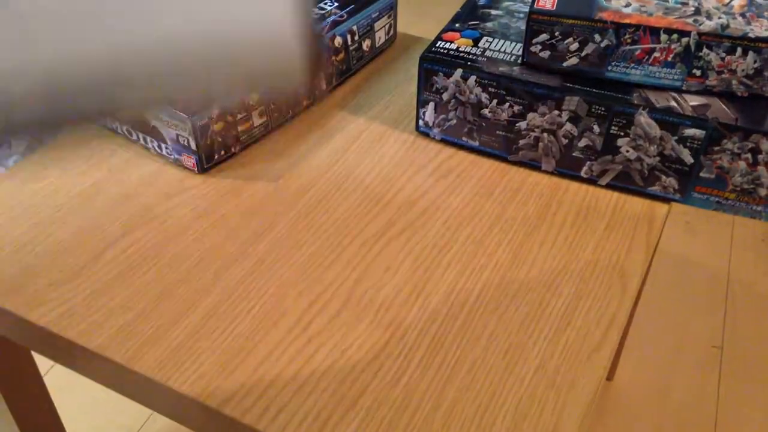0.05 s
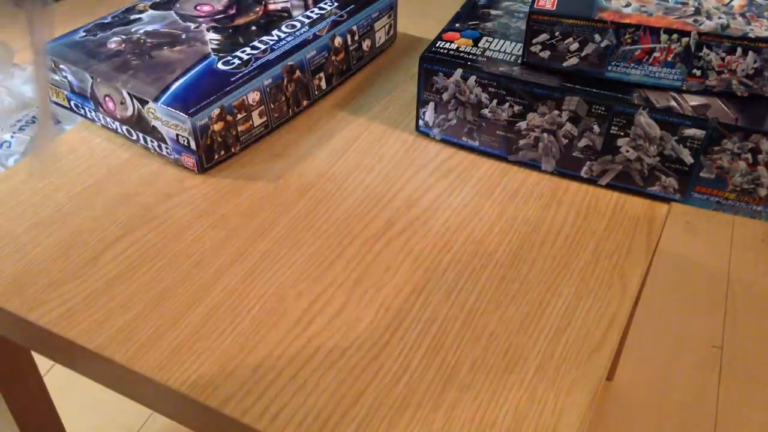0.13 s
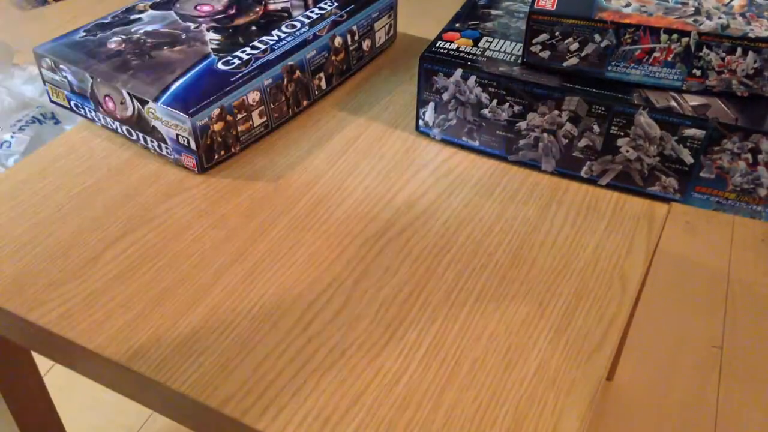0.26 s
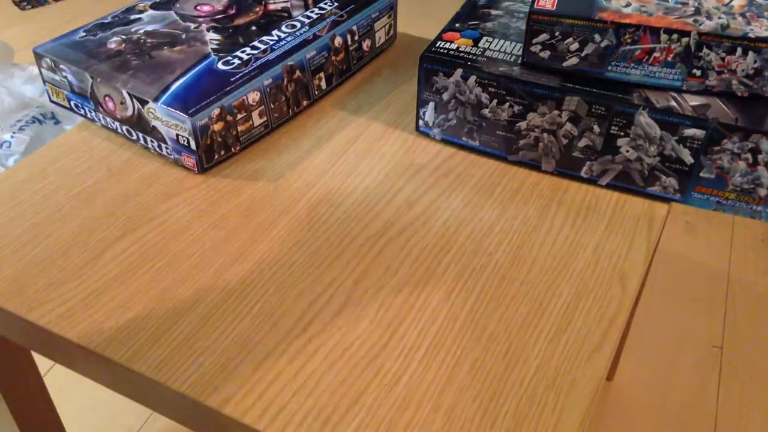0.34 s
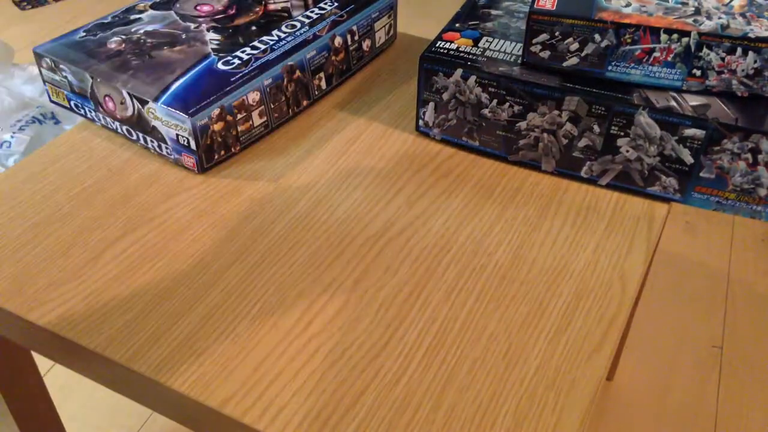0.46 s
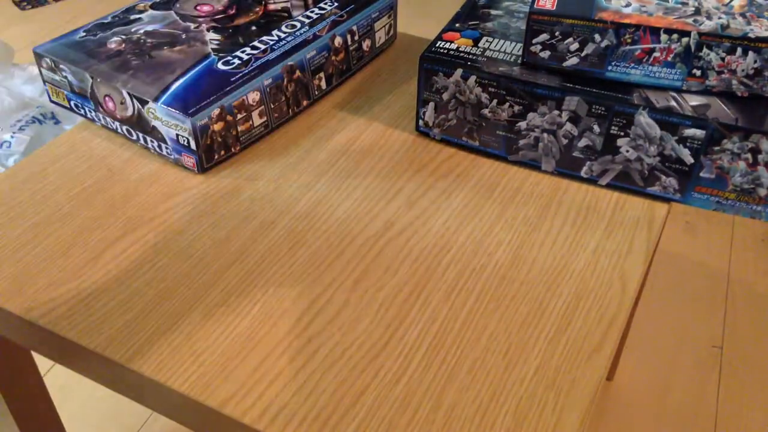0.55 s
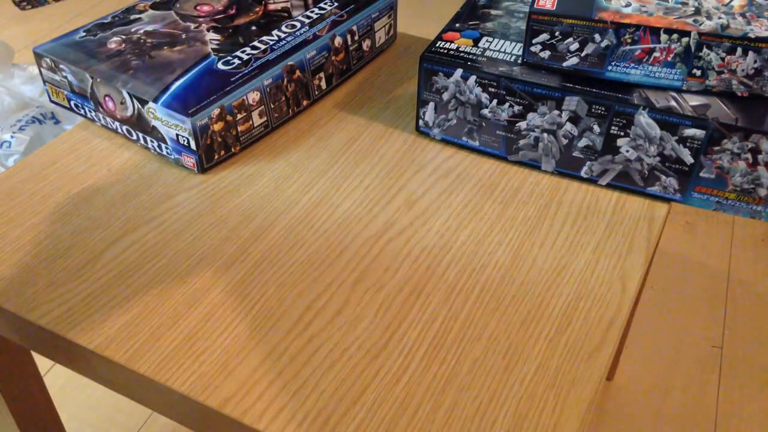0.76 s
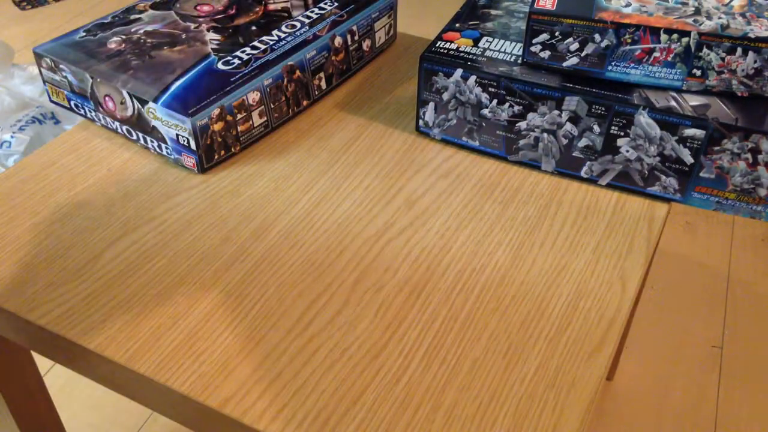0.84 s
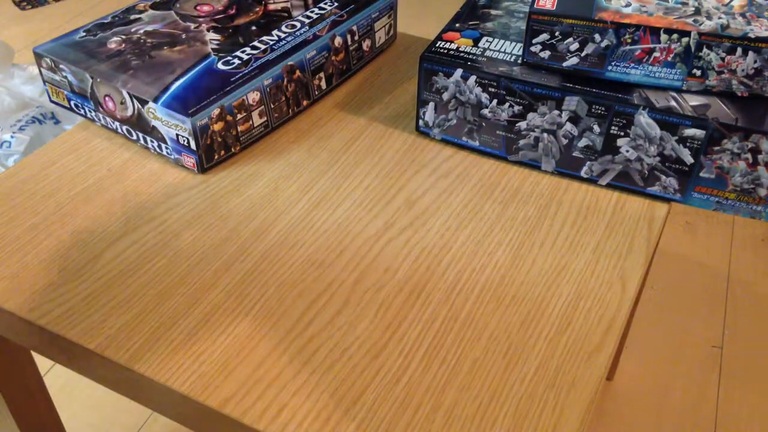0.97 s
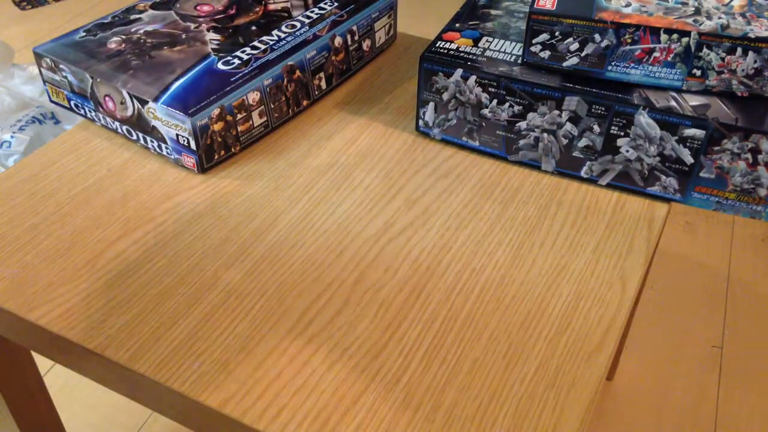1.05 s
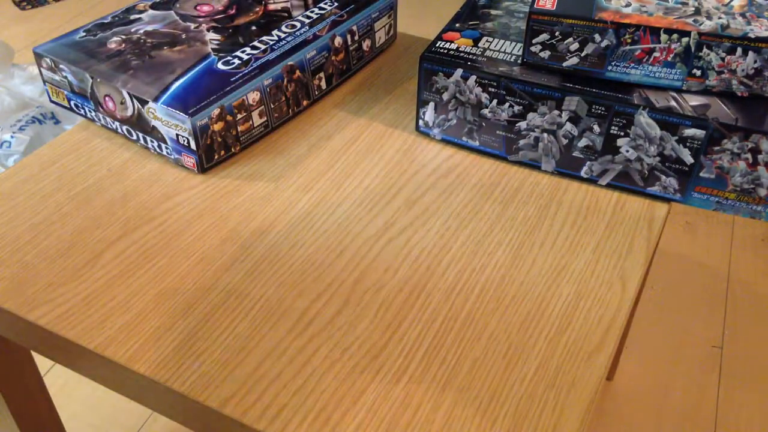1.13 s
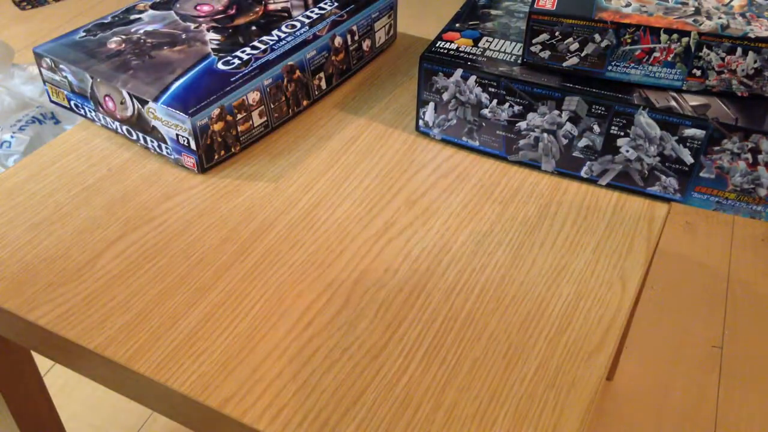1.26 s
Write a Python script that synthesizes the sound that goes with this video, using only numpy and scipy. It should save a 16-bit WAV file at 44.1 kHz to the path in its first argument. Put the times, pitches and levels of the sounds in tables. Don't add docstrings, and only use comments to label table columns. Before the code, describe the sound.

Close handling of a cardboard box: gritty rubbing, a quick clicking pop of the lid, a short creak, a harder squeaky creak, then sparse ticks and snaps over faint room hum.

```python
import sys
import numpy as np
from scipy import signal
from scipy.fft import rfft, irfft
from scipy.io import wavfile
from scipy.ndimage import uniform_filter1d

SR = 44100
rng = np.random.default_rng(int(sys.argv[2]) if len(sys.argv) > 2 else 0)


def wav_out(sig):
    wavfile.write(sys.argv[1], SR, np.round(np.clip(np.atleast_2d(sig).T, -1, 1) * 32767).astype(np.int16))


def linear_from_db(decibels):
    return 10 ** (np.asarray(decibels, float) / 20)


N = 57330

# f/Hz, level/dB per Hz
AIR_COLOUR = [(18, -5.5), (30, -12.5), (355, -3.5), (569, -7), (780, -8.5), (2060, -20.5), (3140, -17.5),
              (4190, -35), (16000, -54)]
# f/Hz, level/dB
HUM_LINES = [(49, -66.5), (150, -68.5), (350, -69)]
# t/s, level/dB
RUB_LEVEL = [(0, -44.5), (0.028, -51.5), (.06, -45), (.1, -42), (0.137, -32), (.19, -31), (0.203, -35),
             (0.248, -35.5), (.3, -42), (.33, -47.5), (.47, -44.5), (0.578, -55), (0.707, -36), (.8, -52.5),
             (0.872, -67), (0.931, -47.5), (1.048, -70), (1.201, -71), (1.236, -49.5), (1.3, -73)]
# f/Hz, level/dB per Hz
RUB_COLOUR = [(180, -44.5), (300, -8), (762, -5.5), (842, -10.5), (1430, -5), (1870, -3.5), (3240, -1),
              (5800, 1.5), (16000, -4.5)]
# times [t/s], then levels [level/dB]
OVERLAP_TIMES = (0.087, 0.26, .21)
OVERLAP_LEVELS = (2, -17, 7)
# t/s, peak level/dB, colour f/Hz, length/ms
TICK_EVENTS = [(0.0333, -27, 7480, 4), (0.046, -32, 5460, 7), (.0563, -24, 6000, 4.2),
               (0.0694, -32, 3140, .8), (0.338, -35, 7000, 19), (0.371, -28.5, 10900, 3.2),
               (0.524, -37.5, 7100, 5.8), (.545, -29.5, 6660, 3.7), (0.552, -34, 2150, 5.6),
               (0.5927, -19, 12100, 0.25), (0.833, -29, 6040, 2.1), (0.9233, -29, 3200, 1.4),
               (0.9252, -33.5, 11100, 2), (0.933, -33, 4000, 1.6), (0.935, -37, 12500, 2.6),
               (0.9406, -27.5, 4000, 2.1), (0.9432, -27, 5850, 2.5), (1.0047, -34, 2010, 1.6),
               (1.087, -44, 9260, 0.75), (1.097, -42.5, 2880, 3.6), (1.105, -47, 7930, 5),
               (1.1163, -33, 13070, 2), (1.193, -43.5, 4000, 5.1), (1.2052, -31, 9000, 0.78),
               (1.2284, -37, 7000, .7), (1.24, -40, 10000, 1.5), (1.243, -36, 12000, 2),
               (1.2533, -39.5, 7060, 1.6)]
# f/Hz, level/dB per Hz
TICK_TONE = [(300, -44), (1000, -0.5), (3000, 4), (8000, 0.5), (16000, 7.5)]
# t/s, level/dB, push/ms
BUMPS = [
    (0.2075, -36, 2.4),
    (.2105, -39, 2.73),
    (0.289, -38.5, 1.1),
    (.25, -45, 5.7),
    (0.699, -52.5, 5.2),
    (1.14, -53, 13),
]
# t/s, peak level/dB, colour f/Hz, length/ms
POP_EVENTS = [(0.21, -14.5, 8800, 0.6), (0.2183, -17.5, 13400, 2.4), (0.2213, -12.5, 2960, 10.4),
              (0.2262, -11.5, 2850, 8.1), (0.2354, -11.5, 2900, 5.3), (.2435, -11, 10400, 4.2),
              (0.2548, -19.5, 7050, 2.2), (.260, -26.5, 10900, 21.6), (.2695, -34, 2980, 4.1),
              (0.2912, -31, 1570, 15), (.2989, -33, 830, 4.7)]
# f/Hz, level/dB per Hz
POP_TONE = [(300, -7), (1000, 3), (3000, 1.5), (6000, 5.5), (8500, -1), (11000, 2.5), (16000, 6.5)]
# f/Hz, level/dB, time to fall 60 dB/s
POP_BOX = [(109, -12.5, 0.051), (175, -10, 0.018), (245, -8, 0.031), (519, -2, 0.038), (840, -21, 0.048),
           (1111, -9.5, 0.029)]
# t/s, peak level/dB, edge pitch f/Hz
FIRST_CREAK = [(.3796, -20.5, 2230), (0.3831, -17.5, 2270), (.3874, -13.5, 2850), (.394, -10.5, 2520),
               (0.3989, -8.5, 2280), (0.4029, -17, 2400), (0.4043, -16.5, 2200), (0.4068, -10, 2500),
               (0.4108, -19.5, 2450), (.414, -9.5, 2550), (0.4188, -7.5, 2530), (.424, -8.5, 2470),
               (0.4262, -12.5, 2800), (0.4299, -14, 2600), (0.4351, -14.5, 2450), (0.4371, -17.5, 2670),
               (0.4374, -12.5, 2900), (0.4433, -20, 2730), (.449, -24.5, 2600), (0.4596, -24.5, 2710),
               (0.4641, -17, 2750), (0.5053, -34.5, 2970)]
# t/s, level/dB, push/ms
FIRST_FLEX = [
    (.3975, -46.5, 1),
    (.4075, -44.5, 1),
    (.432, -46.5, 1),
]
# f/Hz, level/dB, time to fall 60 dB/s
FIRST_BOX = [(248, -43, 0.05), (414, -6.5, 0.038), (738, -10.5, 0.03), (1058, -17, 0.052)]
# t/s, peak level/dB, edge pitch f/Hz,
# length/ms, edge ring level/dB
SECOND_CREAK = [(.4918, -24, 2870, 1.23, 8), (.5921, -34, 2800, 2.1, 5.5), (.6072, -17, 2850, 3, 8),
                (.6142, -11, 2800, 2.34, 5), (.6224, -18, 3150, 1.5, 3), (.6262, -4, 2890, 1.1, 3),
                (.6243, -3.5, 2940, 1.25, 3), (.6288, -7.5, 2884, 2, 7.5), (.6383, -11.5, 3400, 1.75, 12),
                (.6414, -11, 3250, 1.9, 3.5), (.6448, -7.5, 3050, 3.7, -4.5), (.6543, -10, 3440, 6.6, -9.5),
                (.6584, -10, 2776, 7, -0.5), (.663, -8.5, 2900, 0.59, -8.5), (.6728, -12, 2950, 1.7, 7.5),
                (.675, -11, 2900, 2.1, 5.5), (.6779, -8, 3030, 1.6, 1), (.680, -13, 2870, 2.8, 8),
                (.6906, -3.5, 2790, 1.58, -7.5), (.6925, -10.5, 2980, 0.9, 4.5),
                (.695, -14.5, 3330, 3.2, 4), (.6998, -9, 3200, 0.79, -27), (.7026, -11, 3390, 4.8, -9.5),
                (.7185, -39, 2920, 3.4, 0), (.740, -32, 3100, 1.9, -23)]
# t/s, level/dB, push/ms
SECOND_FLEX = [
    (.6285, -35, 1.6),
    (.6815, -40, 1.2),
    (.6865, -36.5, 0.94),
    (.694, -38, .8),
    (.718, -40, .8),
    (.727, -41, 0.71),
    (.737, -53, 0.66),
]
# f/Hz, level/dB, time to fall 60 dB/s
SECOND_BOX = [(101.9, -25.5, 0.0524), (253, -41.5, 0.031), (392, -6, 0.032), (493, -8, 0.03),
              (810, -11, 0.019), (1074, -18, 0.05), (1285, -18, 0.032)]
# f/Hz, level/dB per Hz
CREAK_TONE = [(300, -8.5), (1000, -2), (2000, 5), (4000, 1), (7000, -1), (11000, 1), (16000, -0.5)]
# t/s, peak level/dB, colour f/Hz, length/ms, edge ring level/dB
BRIGHT_SNAP = [
    (.8831, -17.5, 4000, 1.8, -30),
]
# f/Hz, level/dB per Hz
BRIGHT_TONE = [(300, -20), (700, -11), (1430, -7), (2930, 1), (4930, -1), (7760, -9), (12400, -3),
               (16500, -5)]
# t/s, peak level/dB, colour f/Hz, length/ms, edge ring level/dB
FIBRE_CRACKS = [
    (.8878, -32, 1600, 1.6, 10),
    (.8914, -39, 2500, 1.6, 0),
    (.8930, -37, 3800, 1.2, -7),
    (.9005, -50, 3010, 5, 9),
    (1.2307, -48, 2410, 0.46, -15.5),
    (1.2325, -30, 2340, 3, -14),
]
# f/Hz, level/dB per Hz
CRACK_TONE = [(200, -21.5), (600, -6), (2000, 20), (6000, -13), (16000, -9)]
# t/s, peak level/dB, colour f/Hz, length/ms, edge ring level/dB
DULL_SNAP = [
    (1.2317, -23.5, 2400, 1.5, -30),
]
# f/Hz, level/dB per Hz
DULL_TONE = [(300, -11), (1300, 0), (2400, 3), (3500, -2), (6240, -4), (9490, -11), (10700, -8),
             (16500, -14)]


def unit(x):
    return x / np.sqrt(np.mean(x ** 2))


def colour(x, shape):
    hz, db = np.array(shape).T
    grid = np.log(np.arange(513) * SR / 1024 + 1)
    log_gain = np.interp(grid, np.log(hz), db) * np.log(10) / 20
    cep = irfft(log_gain)
    cep[1:512] *= 2
    cep[513:] = 0
    taps = irfft(np.exp(rfft(cep)))
    return signal.fftconvolve(x, taps / np.sqrt(np.sum(taps ** 2)))[:len(x)]


def ring(x, hz, width_hz):
    r = np.exp(-np.pi * width_hz / SR)
    feedback = [1, -2 * r * np.cos(2 * np.pi * hz / SR), r * r]
    return signal.lfilter([1, 0, -1], feedback, x) * np.sqrt((1 - r * r) / 2)


def box(x, modes):
    return sum(linear_from_db(db) * ring(x, hz, np.log(1000) / np.pi / t60) for hz, db, t60 in modes)


def panel_push(rows, modes):
    t = np.arange(N) / SR
    push = np.zeros(N)
    for s, db, ms in rows:
        progress = np.clip((t - s) * 1000 / max(ms, .2), 0, 1)
        push += linear_from_db(db) * np.sin(np.pi * progress) ** 2
    return box(push, modes)


def slips(rows, shape, modes, width, upper_hz, upper_db, wide_db, box_db, spiky_db, snap_db,
          rise_ms=0., squeak_db=-63.0, kick_db=-63.0):
    span = 2048
    t = np.arange(span) / SR
    raw, edge, kicks = np.zeros((3, N + span))
    for s, db, hz, ms, edge_db in rows:
        chance = rng.standard_normal(span)
        size = np.minimum(rng.exponential(size=span), 4)
        length = max(ms, .1) / 1000
        rise = np.clip((t * 1000 + .1) / (rise_ms + .1), 0, 1)
        grip = np.exp(-(t / length) ** 2) * rise

        swarm = chance * linear_from_db(spiky_db * size) * grip
        swarm = swarm / np.sqrt(np.sum(swarm ** 2) / (1 + length * SR))
        snap = linear_from_db(snap_db) * (t == 0)
        swarm = linear_from_db(db - 10.0) * (swarm + snap)
        i = int(s * SR)
        raw[i:i + span] += swarm
        kicks[i] += linear_from_db(db - 9.0 + kick_db)

        locked = linear_from_db(db - 12.5 + squeak_db) * grip * np.sin(2 * np.pi * hz * t + chance[-1])
        tone = ring(swarm + locked, hz, 2 * width * hz)
        tone = ring(tone, hz, width * hz)
        match = np.sqrt(np.sum(swarm ** 2) / np.sum(tone ** 2))
        edge[i:i + span] += linear_from_db(edge_db) * tone * match
    flap = linear_from_db(upper_db) * ring(raw, upper_hz, upper_hz / 5)
    fibres = linear_from_db(wide_db) * colour(raw, shape)
    hollow = linear_from_db(box_db) * box(raw + kicks, modes)
    return np.array([edge, flap + fibres + hollow])[:, :N]


def air():
    noise = rfft(rng.standard_normal(N))
    hz, db = np.array(AIR_COLOUR).T
    grid = np.log(np.arange(len(noise)) * SR / N + 1)
    noise = noise * linear_from_db(np.interp(grid, np.log(hz), db))
    t = np.arange(N) / SR
    hum = np.zeros(N)
    for f, level in HUM_LINES:
        waver = 1.6 * unit(uniform_filter1d(rng.standard_normal(N), size=6000))
        hum += linear_from_db(level) * np.sqrt(2) * np.sin(2 * np.pi * f * t + waver)
    return unit(irfft(noise, N)) * linear_from_db(-61) + hum


def slide():
    s, db = np.array(RUB_LEVEL).T
    t = np.arange(N) / SR
    grit = linear_from_db(2.8 * np.minimum(rng.exponential(size=N), 4))
    hiss = unit(colour(rng.standard_normal(N) * grit, RUB_COLOUR))
    split = signal.butter(4, 4000, fs=SR, output="sos")
    low = signal.sosfiltfilt(split, hiss)
    low_gain = linear_from_db(np.interp(t, OVERLAP_TIMES, OVERLAP_LEVELS))
    flutter = unit(uniform_filter1d(rng.standard_normal(N), size=150))
    return (hiss - low + low * low_gain) * linear_from_db(np.interp(t, s, db) + 1.8 * flutter)


def room(x):
    t60_s, top_t60_s, gap_s = 0.18, 0.059, 0.00065
    t = np.arange(SR // 2) / SR
    noise = rng.standard_normal(len(t))
    low = signal.lfilter([.4], [1, -.6], noise)
    tail = low * linear_from_db(-60 * t / t60_s) + (noise - low) * linear_from_db(-60 * t / top_t60_s)
    tail = tail * np.clip(t / gap_s - 1, 0, 1)
    tail = signal.sosfilt(signal.butter(2, 224, "high", fs=SR, output="sos"), tail)
    return linear_from_db(-10) * signal.fftconvolve(x, tail / np.sqrt(np.sum(tail ** 2)))[:N]


def ticks():
    rows = [(*row, -1.5) for row in TICK_EVENTS]
    return slips(rows, TICK_TONE, FIRST_BOX, width=0.59, upper_hz=1600, upper_db=-23.5,
                 wide_db=2.2, box_db=-20, spiky_db=0.81, snap_db=15.1)


def bumps():
    return panel_push(BUMPS, POP_BOX)


def lid_pop():
    rows = [(*row, -4) for row in POP_EVENTS]
    return slips(rows, POP_TONE, POP_BOX, width=0.39, upper_hz=12000, upper_db=-10.0,
                 wide_db=5.44, box_db=-10.5, spiky_db=1.4, snap_db=3)


def first_creak():
    rows = [(*row, 0.95, -2.5) for row in FIRST_CREAK]
    sound = slips(rows, CREAK_TONE, FIRST_BOX, width=0.15, upper_hz=5520, upper_db=0.67,
                  wide_db=2.4, box_db=-5.5, spiky_db=5.7, snap_db=2.2, rise_ms=0.68, kick_db=18)
    sound[1] += panel_push(FIRST_FLEX, FIRST_BOX)
    return sound


def second_creak():
    sound = slips(SECOND_CREAK, CREAK_TONE, SECOND_BOX, width=0.32, upper_hz=5440, upper_db=-5.0,
                  wide_db=-1, box_db=-10.5, spiky_db=0.72, snap_db=9.9,
                  rise_ms=.6, squeak_db=2.0, kick_db=12.5)
    sound[1] += panel_push(SECOND_FLEX, SECOND_BOX)
    return sound


def bright_snap():
    return slips(BRIGHT_SNAP, BRIGHT_TONE, FIRST_BOX, width=1, upper_hz=1200, upper_db=-40,
                 wide_db=0, box_db=-30, spiky_db=2, snap_db=22)


def fibre_cracks():
    return slips(FIBRE_CRACKS, CRACK_TONE, FIRST_BOX, width=0.97, upper_hz=1296, upper_db=-16,
                 wide_db=-0.66, box_db=-2, spiky_db=2.3, snap_db=11.5)


def dull_snap():
    return slips(DULL_SNAP, DULL_TONE, FIRST_BOX, width=1, upper_hz=1200, upper_db=-40,
                 wide_db=0, box_db=-24, spiky_db=2, snap_db=22)


def scene():
    background = air()
    rubbing = slide()
    edge, body = (ticks() + lid_pop() + first_creak() + second_creak()
                  + bright_snap() + fibre_cracks() + dull_snap())
    body = body + rubbing + bumps()
    echoes = room(body + linear_from_db(-5) * edge)
    return (edge + body + echoes + background)[None, :]


def low_pass(x):
    return signal.sosfilt(signal.butter(12, 17010, fs=SR, output="sos"), x)


def record(dry):
    limit = 1.2
    rounded = limit * np.tanh(dry / limit)
    top_cut = signal.ellip(8, .3, 38, 15780, fs=SR, output="sos")
    bass_cut = signal.butter(2, 58, "high", fs=SR, output="sos")
    mix = signal.sosfilt(np.vstack([top_cut, bass_cut]), rounded)
    return low_pass(mix)


dry = scene()
out = record(dry)
wav_out(out)
```